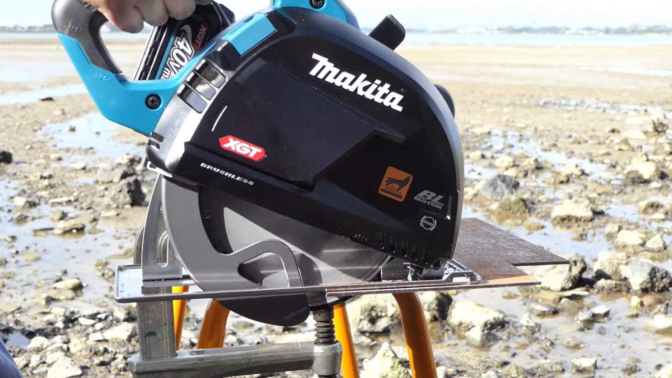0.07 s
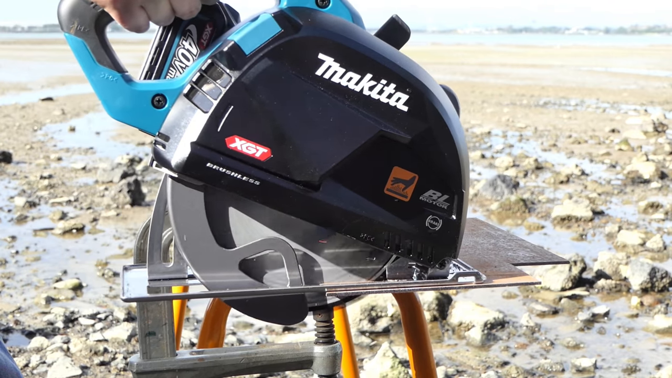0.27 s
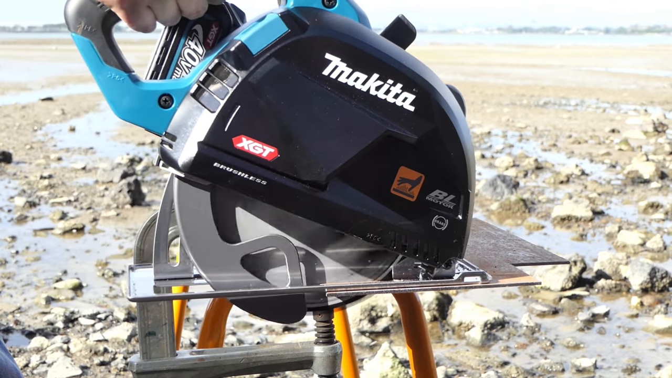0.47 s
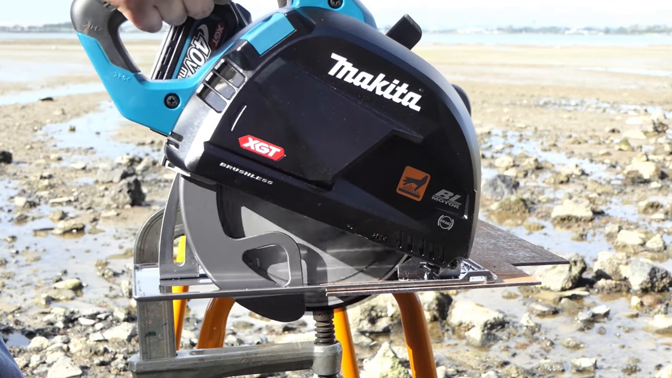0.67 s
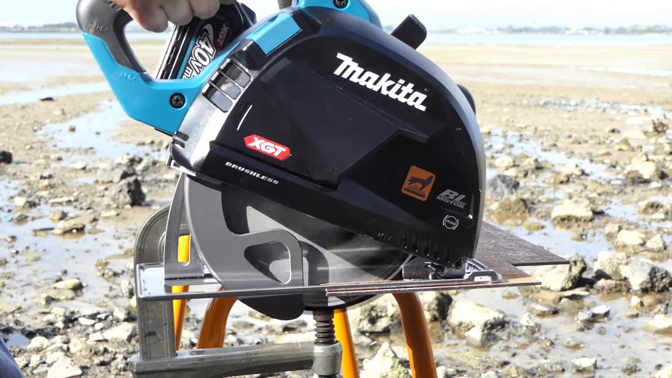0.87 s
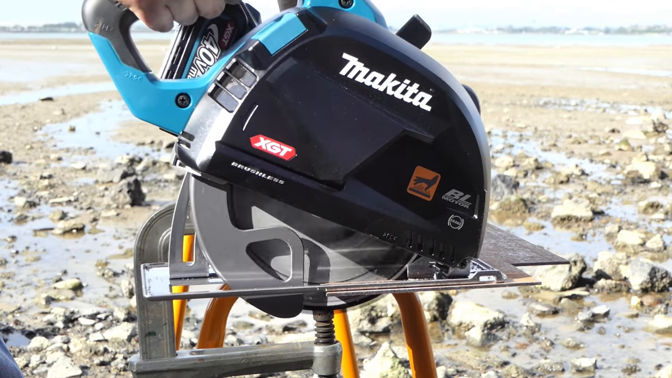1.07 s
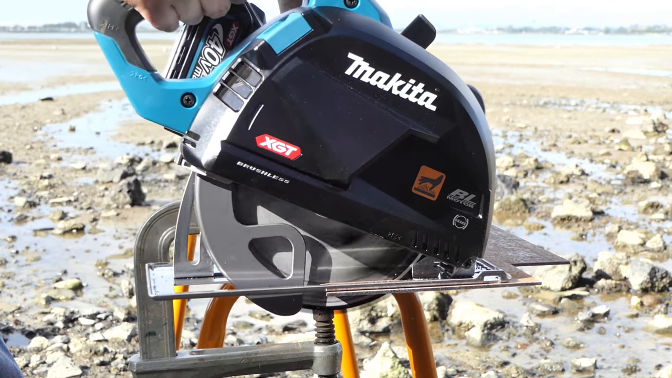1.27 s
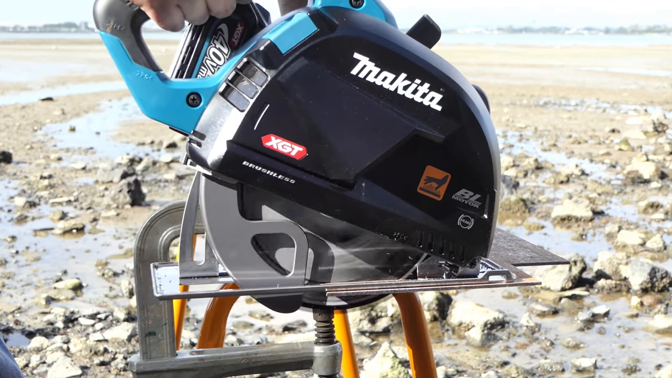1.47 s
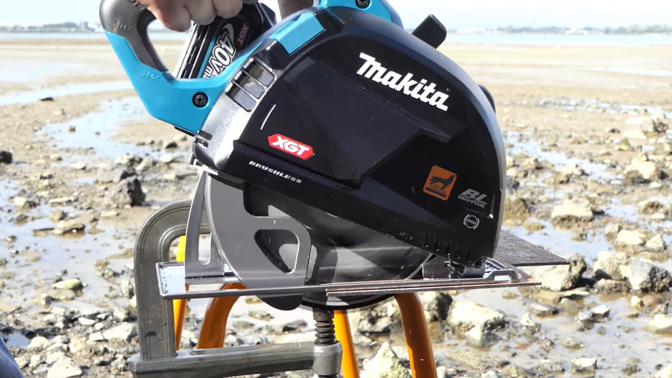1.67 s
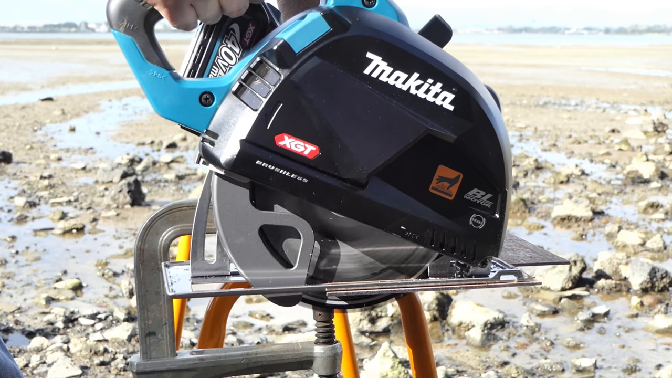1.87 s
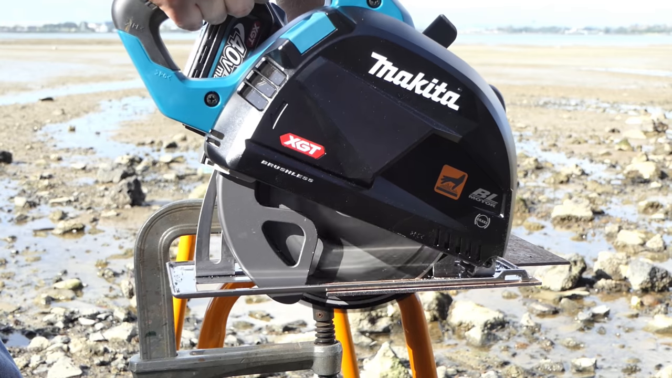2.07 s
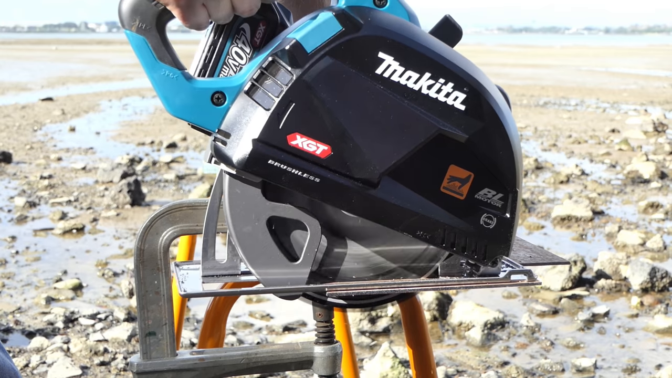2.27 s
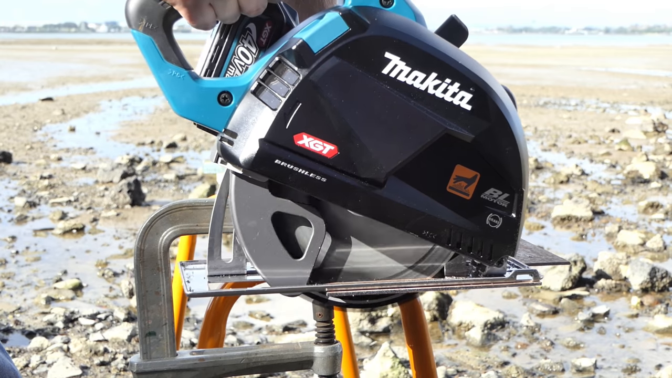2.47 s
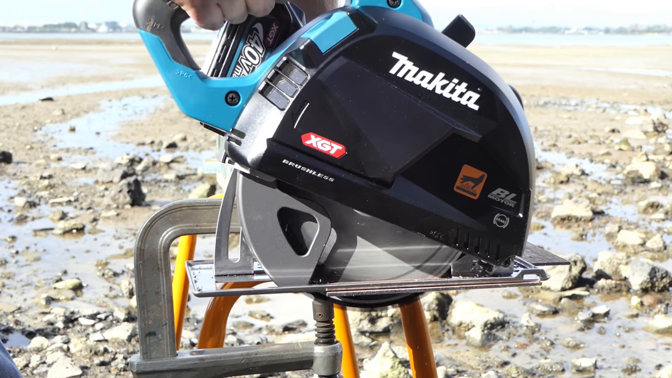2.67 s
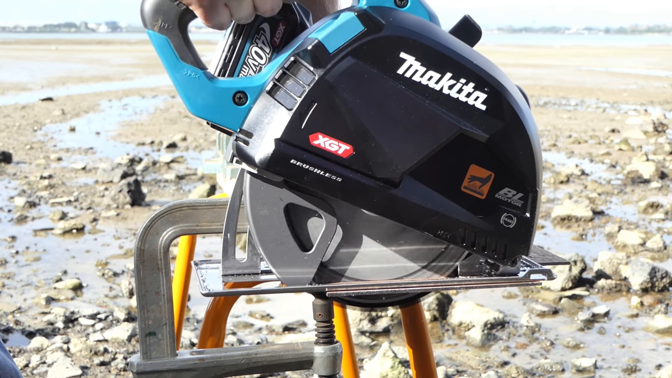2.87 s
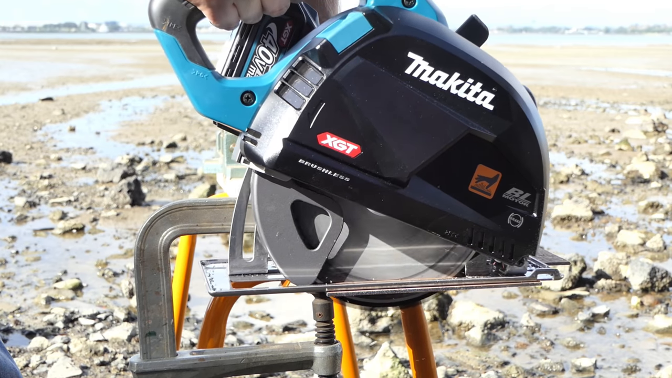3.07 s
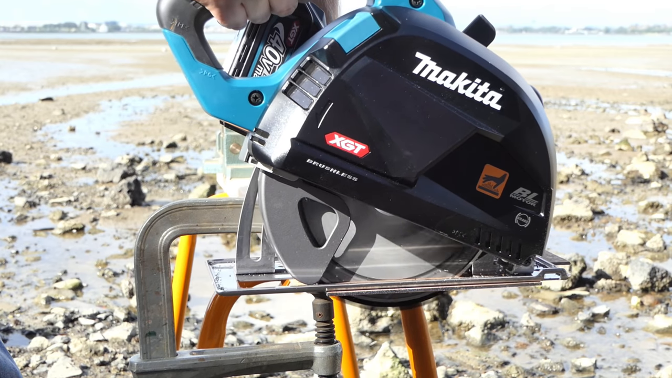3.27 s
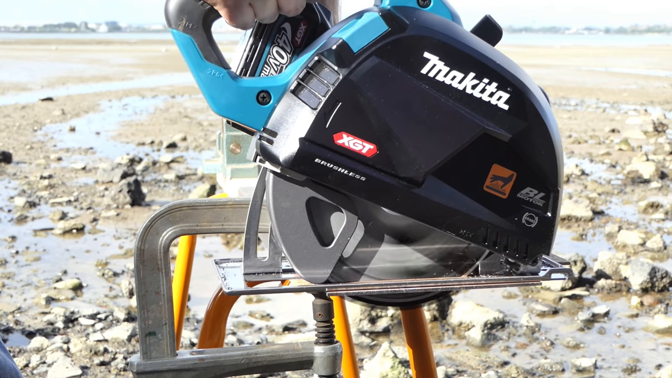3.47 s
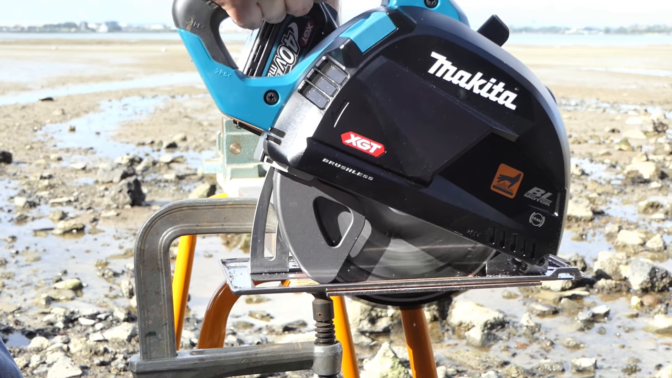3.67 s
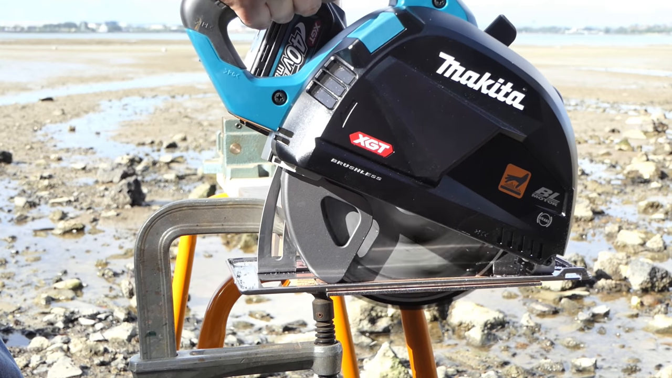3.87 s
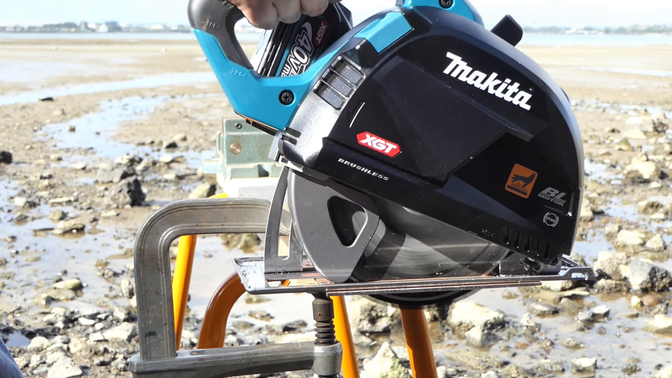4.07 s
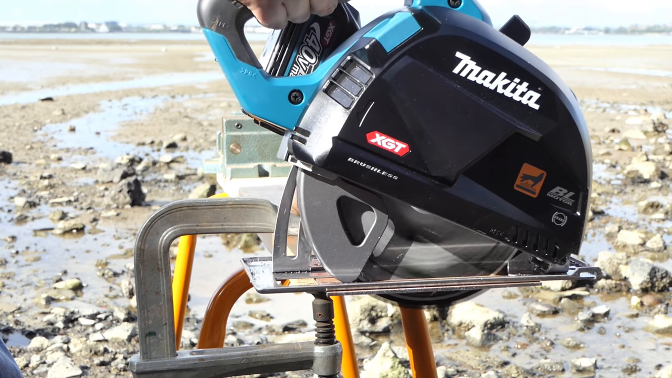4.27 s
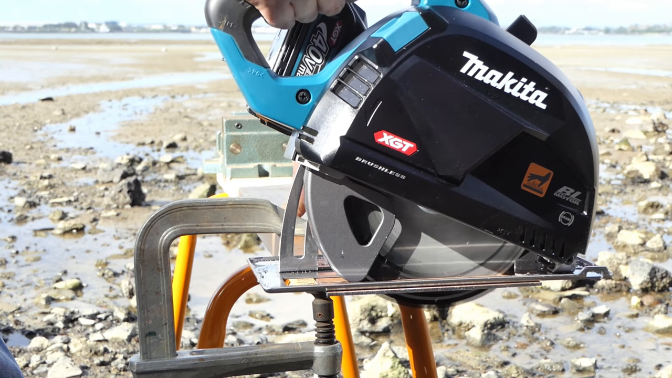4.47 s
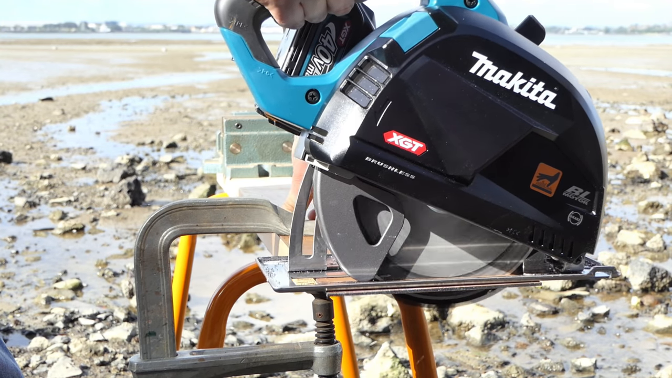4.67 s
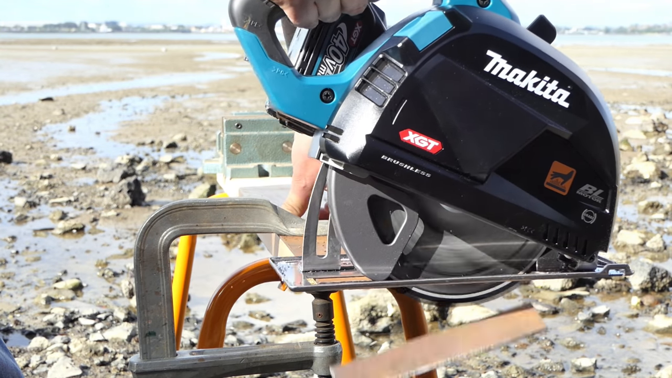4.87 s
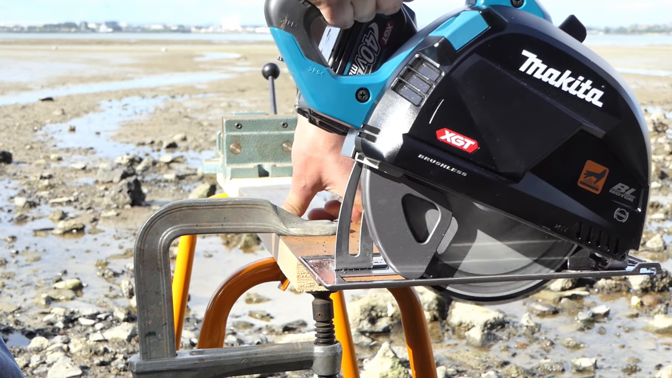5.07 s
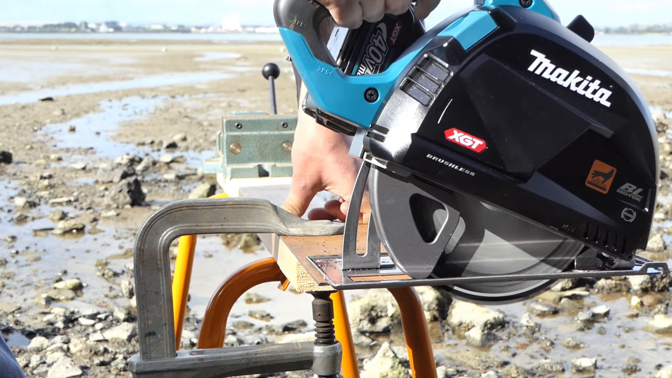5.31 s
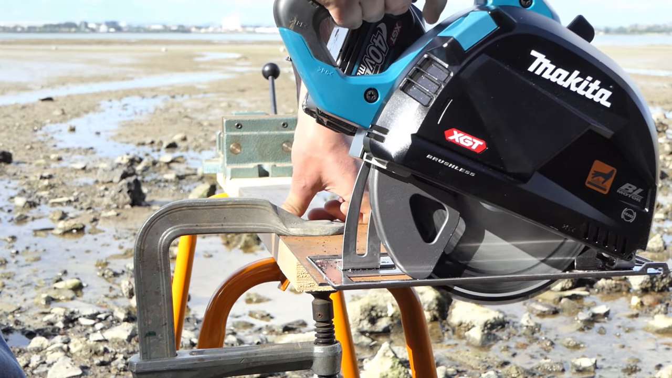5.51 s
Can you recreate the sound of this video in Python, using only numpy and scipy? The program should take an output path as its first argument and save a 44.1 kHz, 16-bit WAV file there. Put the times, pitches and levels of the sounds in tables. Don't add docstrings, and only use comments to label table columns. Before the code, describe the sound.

Close, harsh metal cutting by a power saw screeches for five seconds, drops to a quieter whirring spin, then brakes with a falling whine.

```python
import sys
import numpy as np
from scipy import signal
from scipy.fft import rfft, irfft, next_fast_len
from scipy.io import wavfile
from scipy.ndimage import uniform_filter1d, map_coordinates

SR = 44100
rng = np.random.default_rng(int(sys.argv[2]) if len(sys.argv) > 2 else 0)


def field_ratio(decibels):
    return 10 ** (np.asarray(decibels, dtype=float) / 20)


def int16_out(signal):
    q = np.round(np.clip(np.atleast_2d(signal).T, -1, 1) * 32767)
    wavfile.write(sys.argv[1], SR, q.astype(np.int16))


N = 244314
STEP = 32
TIME = np.arange(N) / SR
SLOW_TIME = np.arange(0, N, STEP) / SR
CUT_END = 5.05
BITE_DB = -21.5
LOW_RUNOUT, HIGH_RUNOUT = .36, .07
RIPPLE_DB = 2.3


def unit(x):
    return x / np.sqrt(np.mean(x ** 2) + 1e-20)


def along(points, hz):
    f, v = np.transpose(points)
    return np.interp(np.log(hz + 1), np.log(f + 1), v)


def spread(slow, step, size):
    return np.interp(np.arange(size), np.arange(len(slow)) * step, slow)


def wobble(rate):
    knots = rng.standard_normal(int(N * rate / SR) + 4)
    return spread(map_coordinates(knots, [np.arange(0, N + STEP, STEP) * rate / SR]), STEP, N)


def bump(s, length, edge):
    inside = length / 2 - np.abs(SLOW_TIME - s)
    return (1 + np.tanh(inside / (2 * edge))) / 2


def swells(rows):
    return spread(sum(db * bump(s, length, edge=0.021) for s, length, db in rows), STEP, N)


def filtered(x, response):
    m = next_fast_len(N + SR // 4)
    return irfft(rfft(x, m) * response(np.fft.rfftfreq(m, 1 / SR)), m)[..., :N]


def ringing(modes, hz, narrow):
    centre, width, *stage_db = np.transpose(modes)[:, :, None]
    band = hz * narrow * width
    each = (band / (centre ** 2 - hz ** 2 + 1j * band)) ** 2
    gains = field_ratio(stage_db)[:, :, 0]
    summed = gains @ each
    direction = summed / (np.abs(summed) + 1e-20)
    return np.sqrt(gains ** 2 @ np.abs(each) ** 2) * direction


def small_modes(x):
    z = signal.stft(x, nperseg=2048)[2]
    field = uniform_filter1d(rng.standard_normal(z.shape[1:]), size=4, axis=0)
    field = uniform_filter1d(field, size=14, axis=1)
    return signal.istft(z * field_ratio(RIPPLE_DB * unit(field)), nperseg=2048)[1][:, :N]


def strikes(chatter_db, runout, flutter_db):
    shaft_hz = 57.86
    turn = np.cos(2 * np.pi * shaft_hz * TIME + rng.normal(0, 0.92))
    level = field_ratio(chatter_db + flutter_db * wobble(14))
    return unit(rng.standard_normal((2, N)) * (1 + runout * turn) * level)


def free_share():
    return np.clip((TIME - CUT_END) / 0.062, 0, 1)


# time in seconds, change of bite in dB.
TOOTH_JOLTS = [(.105, 2.5), (.18, -1.5), (.205, -4), (.317, -3.5), (.479, 3.5), (.768, 0), (.851, 2),
               (.895, -3.5), (1.018, 2.5), (1.053, 2.5), (1.172, 3), (1.78, 0.5), (1.901, -2), (2.13, -4),
               (2.257, 4.5), (2.3, 3), (2.382, 3.5), (2.467, 3), (2.612, 1), (2.634, -5), (2.749, 3.5),
               (2.943, 2.5), (3.08, 3.5), (3.13, -3.5), (3.345, .3), (3.4, -4), (3.704, 4), (3.8, 3.5),
               (3.944, -1.5), (4.063, 3), (4.487, 3.5), (4.535, 0.5), (4.607, 2), (4.759, 1.5),
               (4.935, 4.5), (5.021, 3)]


def jolts():
    half_length = 0.0061
    return spread(sum(db * np.exp(-((SLOW_TIME - s) / half_length) ** 2) for s, db in TOOTH_JOLTS), STEP, N)


# middle in seconds, length in seconds, change of bite in dB.
FEED_STUTTERS = [(.02, 0.055, -2), (.19, 0.025, -2), (.33, 0.025, -1), (.42, 0.023, -0.5), (.51, 0.032, -1),
                 (.57, 0.088, -4), (.74, 0.063, -2), (.92, 0.052, -2.5), (1.12, 0.13, -3), (1.87, 0.15, -3),
                 (2.04, 0.13, 0), (2.15, 0.065, -1.5), (2.37, 0.23, -5.5), (2.33, 0.027, -3),
                 (2.52, 0.046, -1), (2.67, 0.075, -2.5), (2.84, 0.16, -4.5), (2.825, .04, -5.5),
                 (3.205, 0.21, -6.5), (3.35, 0.032, 2.5), (3.41, 0.041, -0.5), (3.61, 0.1, -1.5),
                 (3.85, 0.23, -3), (3.96, 0.081, -4), (4.69, .07, -2), (4.27, .04, -2.5),
                 (4.555, 0.036, -1), (4.35, 0.14, -4.5), (4.33, 0.055, -5.5), (4.6, 0.045, 1.9),
                 (4.8, .3, -2.5), (2.98, 0.084, -1.5), (4.967, 0.037, -4.5)]


def bite():
    exit_at, exit_softness = 5.047, 0.018
    free_db, rise_db_per_s = -42.5, 14
    after = TIME - exit_at
    out = (1 + np.tanh(after / (2 * exit_softness))) / 2
    cutting = BITE_DB + swells(FEED_STUTTERS) + jolts()
    running_free = free_db + rise_db_per_s * np.minimum(after, .39)
    return (1 - out) * cutting + out * running_free


CUT_STAGES = [
    0.74,
    2.63,
    3.8,
]


def steel(level_db, modes, chatter_db, runout):
    m = next_fast_len(N + SR // 4)
    coarse = STEP // 4
    responses = ringing(modes, np.fft.rfftfreq(m, 1 / SR)[::coarse], narrow=.9)
    out = 0
    for response, weights in zip(responses, np.eye(len(CUT_STAGES))):
        response = spread(response, coarse, m // 2 + 1)
        share = np.sqrt(np.interp(TIME, CUT_STAGES, weights))
        force = strikes(chatter_db, runout, flutter_db=0.3) * share * field_ratio(level_db)
        out = out + rfft(force, m) * response / np.sqrt(np.mean(np.abs(response) ** 2))
    return irfft(out, m)[:, :N]


# pitch in Hz, width in Hz, level in dB early, midway and late in the cut.
SHEET_MODES = [(1056, 20, -45, -45, -9), (1100, 60, -9, -6, -5), (1145, 60, -7, -7, -4),
               (1198, 45, -3, 0, -1), (1290, 30, -9, -10, -12), (1375, 40, -21, -12, -10),
               (1460, 40, -16, -13, -10), (1515, 40, -6, -10, -9), (1560, 50, -10, -17, -22),
               (1715, 40, -17, -21, -45)]
# middle in seconds, length in seconds, gain in dB.
SHEET_FLAPS = [(.1, 0.09, -1), (.3, .1, 0), (.43, 0.089, 1.5), (.72, .1, 0.5), (.92, 0.092, 3.5),
               (2.35, 0.16, -0.5), (3.5, .05, 1.5), (1.55, 0.086, 2), (1.78, 0.087, 0.5),
               (1.99, 0.049, 2.5), (2.09, 0.07, 3), (2.26, .04, 4.5), (2.75, 0.045, 3.5), (2.55, 0.045, 4),
               (2.93, 0.26, 3), (3.37, 0.056, 2), (3.93, 0.13, 5.5), (4.07, 0.05, 5.5), (4.23, 0.074, 3.5),
               (4.42, 0.11, 5), (4.6, 0.071, 4), (4.82, 0.25, 5.5), (5.01, 0.035, 4), (5.46, 0.27, 5.5)]


def sheet_ring(chatter_db):
    level = bite() - 11.6 + swells(SHEET_FLAPS) + 1.1 * wobble(19)
    return steel(level - 4 * free_share(), SHEET_MODES, chatter_db, LOW_RUNOUT)


# pitch in Hz, width in Hz, level in dB early, midway and late in the cut.
STAND_MODES = [(335, 70, -45, -37, -26), (400, 60, -41, -35, -28), (487, 45, -36, -29, -21),
               (522, 20, -21, -26, -45), (650, 60, -36, -32, -27), (745, 55, -22, -24, -16),
               (805, 55, -18, -29, -23), (860, 30, -24, -28, -32)]


def frame_ring(chatter_db):
    shaking_on = 14 * np.exp(-np.abs(TIME - CUT_END) / 0.11) - 0.5
    level = bite() - 27 + 1.1 * wobble(12) + free_share() * shaking_on + .4 * swells(SHEET_FLAPS)
    return steel(level, STAND_MODES, chatter_db, LOW_RUNOUT)


# pitch in Hz, width in Hz, level in dB early, midway and late in the cut.
GUARD_MODES = [(1850, 160, -21, -45, -45), (1975, 60, -26, -18, -17), (2058, 50, -11, -19, -17),
               (2245, 70, -28, -24, -18), (2390, 60, -45, -45, -24), (2700, 50, -45, -15, -9)]


def guard_ring(chatter_db):
    return steel(bite() - 19.5, GUARD_MODES, chatter_db, LOW_RUNOUT)


# pitch in Hz, width in Hz, level in dB early, midway and late in the cut.
BODY_MODES = [(2960, 60, -21, -22, -45), (3110, 70, -6, -8, -9), (3165, 60, -5, -9, -10),
              (3218, 55, -1, -3, 2), (3270, 60, -6, -12, -10), (3322, 60, -4, -2, -1),
              (3455, 70, -9, -19, -18), (3560, 150, -12, -17, -19)]
# middle in seconds, length in seconds, gain in dB.
BLADE_SONGS = [(.1, 0.38, 2.5), (1.36, .1, 0), (1.7, 0.23, -2), (1.3, .1, -2), (2.02, .1, -1),
               (3.03, .1, -1), (2.6, 0.26, 0.5), (2.89, .08, 6), (3.3, 0.13, 2), (3.55, 0.14, 0.5),
               (3.82, 0.17, 2.5), (4.35, 0.077, 1), (4.68, 0.087, 1.5), (4.9, 0.078, 2), (5.06, .04, -2),
               (5.35, 0.28, 6.5)]


def blade_ring(chatter_db):
    level = bite() - 7.9 + swells(BLADE_SONGS) + 1.1 * wobble(18)
    return steel(level - 8 * free_share(), BODY_MODES, chatter_db, HIGH_RUNOUT)


# pitch in Hz, width in Hz, level in dB early, midway and late
PLATE_AND_RIM_MODES = [(3700, 60, -11, -22, -19), (3980, 200, -12, -17, -22), (4330, 100, -18, -12, -13),
                       (4680, 200, -22, -22, -25), (5180, 120, -17, -17, -15), (5740, 200, -13, -17, -14),
                       (6030, 250, -8, -11, -18), (6500, 100, -10, -14, -14), (6790, 250, -11, -12, -19),
                       (7530, 100, -9, -8, -14), (7700, 130, -45, -24, -18), (8150, 150, -20, -19, -20),
                       (8540, 100, -22, -13, -12), (8890, 170, -11, -7, -5), (9050, 250, -11, -16, -25),
                       (9260, 100, -14, -13, -9), (9620, 80, -8, -6, -9), (10000, 160, -9, -15, -25),
             (10170, 110, -7, -3, -9), (10230, 110, -6, -8, -8), (10400, 150, -6, -8, -14),
             (10600, 100, -15, -10, -5), (10705, 60, -9, -6, -6), (11300, 90, -27, -32, -12),
             (11890, 80, -8, -12, -10), (12100, 90, -45, -27, -19), (13075, 130, -14, -14, -13),
             (13250, 130, -15, -16, -17), (14300, 200, -18, -17, -12), (15300, 250, -29, -30, -28),
             (15600, 150, -26, -29, -29)]
# middle in seconds, length in seconds, change in dB.
RIM_SWELLS = [(1.0, .08, -0.5), (1.95, 0.11, 1), (2.82, .06, 0.5), (3.9, 0.11, -1), (4.17, 0.23, -0.5),
              (4.45, 0.3, -2), (4.62, 0.076, -2), (4.82, .25, -2.5), (5.0, .08, -1.5), (5.075, .04, 7)]


def rim_ring(chatter_db):
    level = bite() - 3.5 - 13 * free_share() + swells(RIM_SWELLS)
    return small_modes(steel(level, PLATE_AND_RIM_MODES, chatter_db, HIGH_RUNOUT))


# frequency in Hz, level in dB per Hz.
GRIND_COLOR = [(200, -40.5), (300, -27.5), (600, -18.5), (930, -11.5), (1050, -8.5), (1800, -6.5),
               (2800, -6.5), (3700, -5), (5000, -5), (6500, -1.5), (9500, 0.5), (11500, -1), (12600, -5.5),
               (14000, -7), (15100, -14)]


def chip_grind(force):
    return (1 - free_share()) * unit(filtered(force, lambda f: field_ratio(along(GRIND_COLOR, f))))


# frequency in Hz, level in dB per Hz.
IDLE_COLOR = [(180, -36), (300, -27), (801, -17.5), (1010, -19), (1170, -10), (1700, -12.5), (2040, -9.5),
              (2520, -14.5), (3270, -12), (4180, -12), (5400, -18), (6300, -10.5), (10500, -9),
              (12600, -16.5), (15000, -26)]
# pitch in Hz, width in Hz, level in dB.
FREED_MODES = [(1180, 61, -0.5), (2640, 50, -14), (3300, 80, 2), (3500, 80, -9), (5870, 200, -7),
               (7600, 150, -14), (12000, 200, -12)]
# middle in seconds, length in seconds, change in dB.
FREE_LULL = [
    (5.13, 0.085, -1.5),
]


def free_run(force):
    def color(f):
        return field_ratio(along(IDLE_COLOR, f)) + 0.58 * np.abs(ringing(FREED_MODES, f, 0.9)[0])

    return free_share() * field_ratio(2.2 + swells(FREE_LULL)) * unit(filtered(force, color))


def cut():
    chatter_db = 0.65 * wobble(32) + 0.53 * wobble(21.87)
    rings = rim_ring(chatter_db) + blade_ring(chatter_db) + sheet_ring(chatter_db)
    rings = rings + guard_ring(chatter_db) + frame_ring(chatter_db)
    force = small_modes(strikes(chatter_db, HIGH_RUNOUT, flutter_db=0.95))
    return rings + field_ratio(bite() - 2.5) * (chip_grind(force) + free_run(force))


def tone(track, drift_hz, shake_db, multiple=1, gain_db=0):
    s, *columns = np.transpose(track)
    hz, db = [np.interp(TIME, s, column) for column in columns]
    gate = np.clip(np.minimum(TIME - track[0][0], track[-1][0] - TIME) / 0.0064, 0, 1)
    phase = 2 * np.pi * np.cumsum(multiple * hz + drift_hz * wobble(60)) / SR
    level = field_ratio(db + gain_db + shake_db * wobble(25.4))
    return np.sqrt(2) * gate * level * np.sin(phase)


# time in seconds, tooth rate in Hz, level at twice that rate in dB.
TOOTH_RATE = [(.04, 2580, -43), (.3, 2576, -55), (.7, 2585, -41), (1, 2586, -44), (1.2, 2592, -33),
              (1.35, 2576, -33), (1.5, 2586, -33), (1.7, 2579, -42), (1.95, 2586, -41), (2.3, 2587, -50),
              (2.43, 2595, -41), (2.65, 2572, -48), (3, 2570, -44), (3.2, 2604, -48), (3.4, 2551, -48),
              (3.66, 2564, -46), (3.79, 2591, -36), (3.95, 2592, -54)]


def tooth_whine():
    base = [(s, hz, -46.5) for s, hz, _ in TOOTH_RATE]
    double = tone(TOOTH_RATE, drift_hz=4.2, shake_db=1.3, multiple=2, gain_db=-0.1)
    return double + field_ratio(bite() - BITE_DB) * tone(base, drift_hz=2.8, shake_db=1.2)


# middle in seconds, length in seconds, pitch in Hz, level in dB.
SINGING_TONES = [(0.115, 0.13, 2061, -35), (0.31, 0.16, 2058, -38.5), (.45, 0.085, 2045, -35),
                 (.6, 0.24, 2060, -42.5), (0.98, 0.41, 2043, -41.5), (1.184, 0.056, 2056, -39),
                 (3.52, 0.47, 2060, -46.5), (3.647, .04, 1066, -37), (3.853, 0.35, 1058, -46),
                 (4.085, 0.065, 1057, -31), (4.255, .08, 1048, -50), (4.45, 0.093, 1057, -31.5),
                 (4.596, 0.041, 1064, -43), (4.82, 0.26, 1054, -33), (4.85, 0.28, 1525, -36),
                 (5.02, 0.046, 1529, -42), (3.96, .12, 10720, -38), (4.07, .06, 10716, -31),
                 (4.233, 0.12, 10711, -29.5), (4.45, .16, 10714, -37), (4.61, 0.046, 10570, -28),
                 (4.75, 0.18, 10600, -49), (1.85, 0.24, 10160, -31), (2.12, 0.22, 10175, -34),
                 (3.09, 0.037, 2695, -38), (1.55, 0.064, 1196, -30), (1.992, 0.045, 1200, -29.5),
                 (2.094, 0.064, 1203, -25), (4.24, .05, 1134, -29), (4.52, 0.042, 1178, -30),
                 (.27, .05, 1518, -38), (0.4, .07, 1515, -37), (4.09, .05, 1515, -36),
                 (4.14, .09, 2701, -39), (4.9, 0.047, 2714, -35), (2.903, .05, 3317, -32),
                 (3.5, 0.096, 3223, -29), (3.614, .05, 3208, -27.5), (4.65, .06, 3195, -29),
                 (.25, .05, 9625, -31), (1.76, 0.051, 10148, -28), (3.4, .04, 8930, -26),
                 (3.54, 0.11, 10216, -28), (4.2, .04, 8896, -34), (.12, .1, 522, -55),
                 (0.408, .2, 522, -53.5), (0.92, 0.26, 522, -59), (2.2, 0.11, 525, -54),
                 (0.69, .3, 1515, -45), (0.051, 0.14, 1515, -40)]


def singing():
    drift = np.cumsum(0.00108 * wobble(60)) / SR
    shake = field_ratio(2.5 * wobble(25))
    out = 0
    for s, length, hz, db in SINGING_TONES:
        swell = spread(bump(s, length, edge=0.0094), STEP, N)
        out = out + np.sqrt(2) * field_ratio(db) * swell * np.sin(2 * np.pi * hz * (TIME + drift))
    return shake * out


# frequency in Hz, level in dB per Hz.
RUMBLE_COLOR = [(15, -49), (25, -19), (59, -12), (166, 0), (348, 4.5), (500, -19), (650, -34), (1100, -120)]


def rumble():
    mid, side = filtered(rng.standard_normal((2, N)), lambda f: field_ratio(along(RUMBLE_COLOR, f)))
    shaking = unit(np.array([0.5 * mid + side, 0.45 * mid - side]))
    shaking = field_ratio(bite() - 36.5 + 1.2 * wobble(4.33)) * shaking
    breeze = unit(filtered(rng.standard_normal((2, N)), lambda f: f / (f + 60) / (1 + (f / 150) ** 4)))
    hum = field_ratio(-75.5 + 2.9 * wobble(5)) * np.sin(2 * np.pi * 103 * TIME)
    return shaking + field_ratio(-79.5 + 3.8 * wobble(4.04)) * breeze + hum


# time in seconds, pitch in Hz, level in dB.
GEAR_COAST = [
    (4.99, 1990, -50),
    (5.042, 2036, -47),
    (5.15, 2034, -45.5),
    (5.27, 2003, -44.5),
    (5.36, 1953, -55),
]
# time in seconds, pitch in Hz, level in dB.
MOTOR_BRAKE = [
    (5.425, 1915, -45),
    (5.439, 1898, -36),
    (5.499, 1756, -37.5),
    (5.54, 1670, -47),
]


def gear_whine():
    coast = tone(GEAR_COAST, drift_hz=2.5, shake_db=.8)
    return coast + tone(MOTOR_BRAKE, drift_hz=2.5, shake_db=.8, gain_db=-1.0)


# pitch in Hz, level in dB, time to fall by 60 dB in seconds.
BLADE_RING_OUT = [
    (9690, -41, .9),
    (11950, -43, .7),
    (13240, -44, .4),
]


def ring_out():
    t = np.maximum(TIME - CUT_END + 0.043, 0)
    onset = 1 - np.exp(-t / .012)
    return sum(field_ratio(db - 60 * t / t60) * onset * np.sin(2 * np.pi * hz * t) for hz, db, t60 in BLADE_RING_OUT)


# frequency in Hz, scattered minus direct sound in dB.
SCATTER = [(60, 2), (99, 1), (160, 14), (270, -5), (450, -7.5), (740, -7.5), (1220, -22), (2010, -10),
           (3330, -15.5), (5500, -15.5), (9080, -16), (15000, -6)]
# frequency in Hz, left minus right in dB.
BALANCE = [(60, -1), (110, 12), (200, -5), (380, -2.5), (700, -2), (1290, -1), (2380, -0.5), (4400, 0),
           (8120, -1), (15000, 1)]


def scene():
    direct, scattered = cut()
    mid = direct + tooth_whine() + gear_whine() + singing() + ring_out()
    side = filtered(scattered, lambda f: field_ratio(along(SCATTER, f)))
    stereo = np.array([mid + side, mid - side])
    return filtered(stereo, lambda f: field_ratio(np.outer([.5, -.5], along(BALANCE, f)))) + rumble()


def low_pass(x):
    return signal.sosfilt(signal.butter(12, 15860, fs=SR, output="sos"), x)


# middle in seconds, length in seconds, push in dB.
TOP_BAND = [
    (5.075, .09, 16),
    (5.17, .07, -12),
    (5.255, .03, 14),
    (5.41, .2, -14),
]


def record(dry):
    top_hz, quiet_top_hz = 15880, 15150
    low = filtered(dry, lambda f: f < quiet_top_hz)
    loud = bite() + swells(TOP_BAND) + 6 * wobble(25) > -32
    top = uniform_filter1d(loud * 1., size=400) * (filtered(dry, lambda f: f < top_hz) - low)
    return low_pass(low + top)


dry = scene()
out = record(dry)
int16_out(out)
```